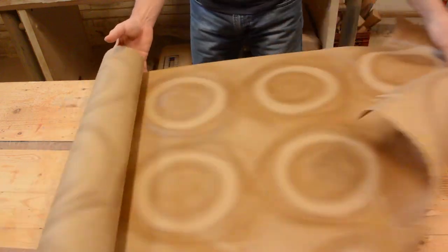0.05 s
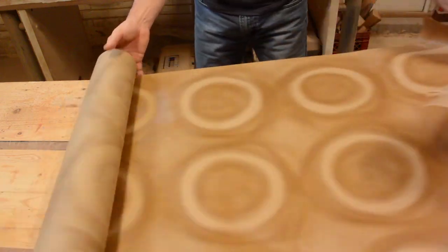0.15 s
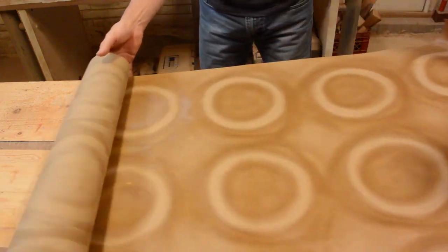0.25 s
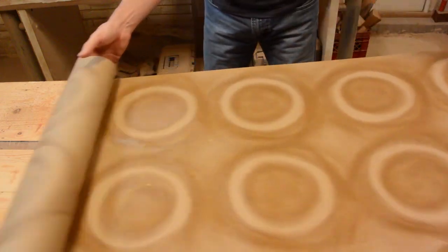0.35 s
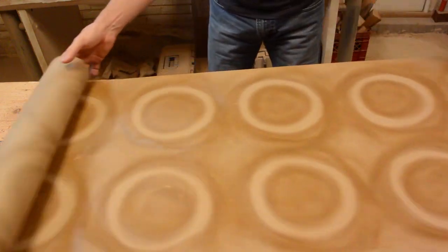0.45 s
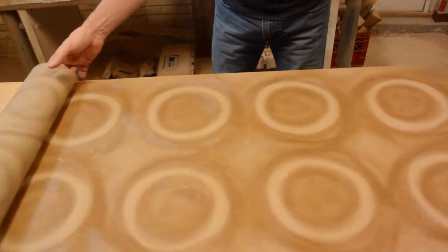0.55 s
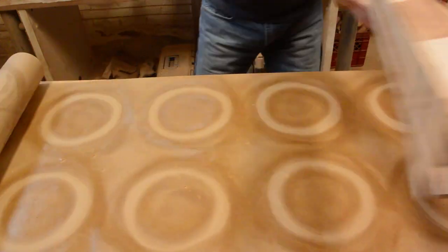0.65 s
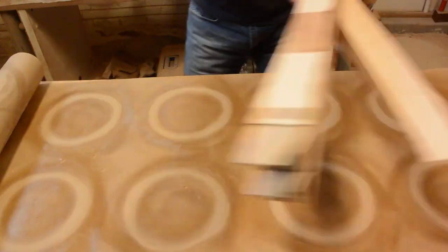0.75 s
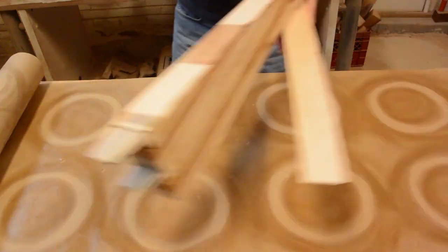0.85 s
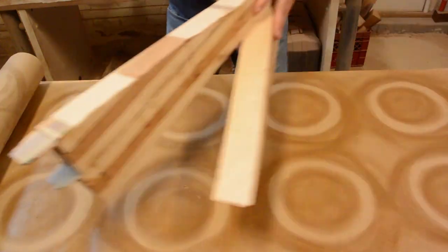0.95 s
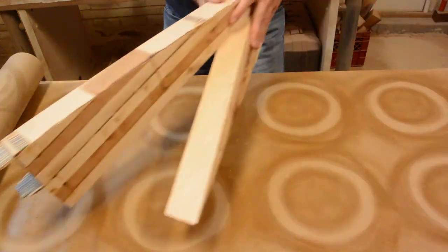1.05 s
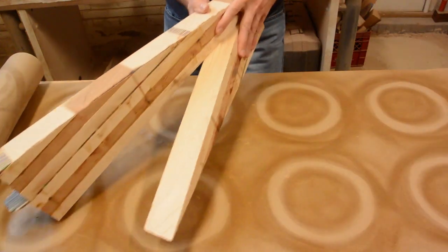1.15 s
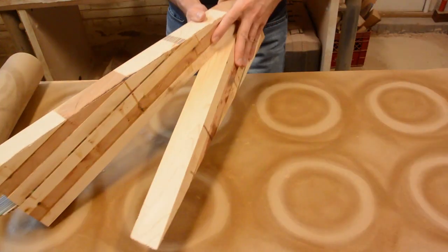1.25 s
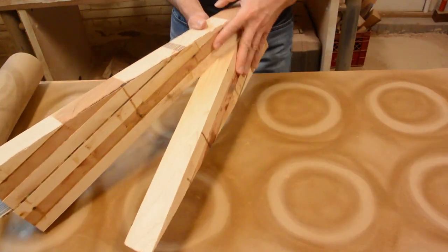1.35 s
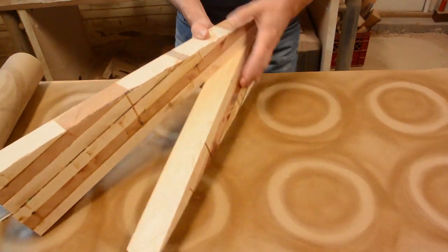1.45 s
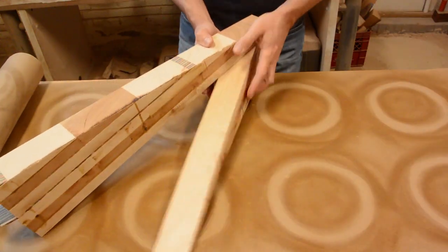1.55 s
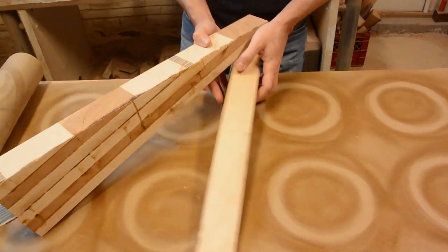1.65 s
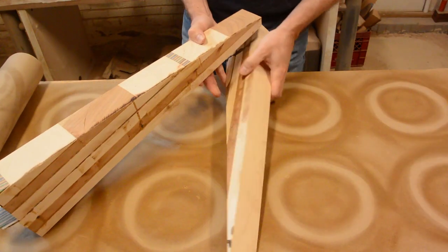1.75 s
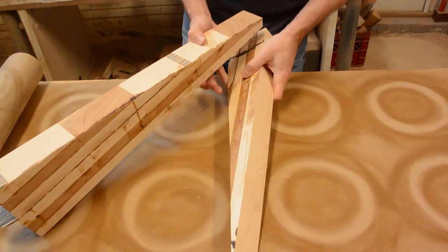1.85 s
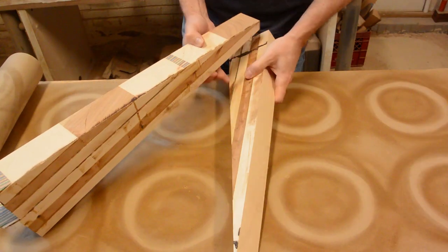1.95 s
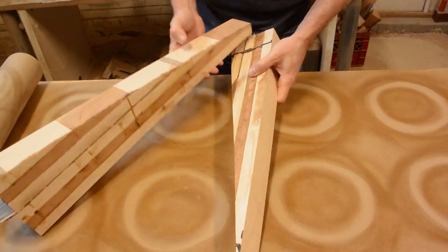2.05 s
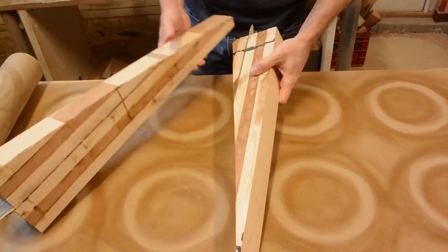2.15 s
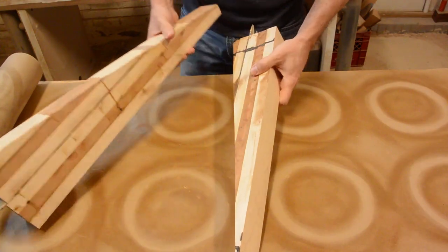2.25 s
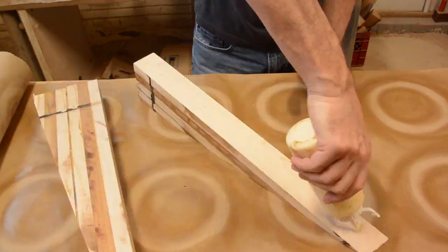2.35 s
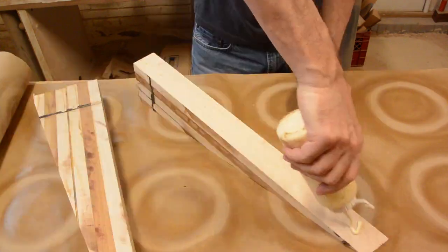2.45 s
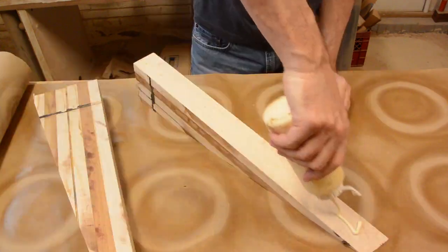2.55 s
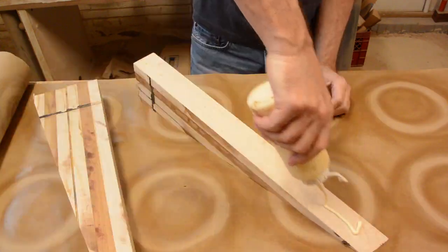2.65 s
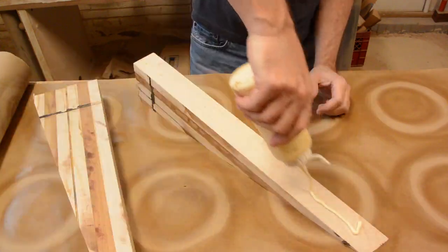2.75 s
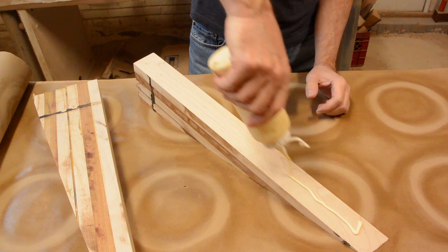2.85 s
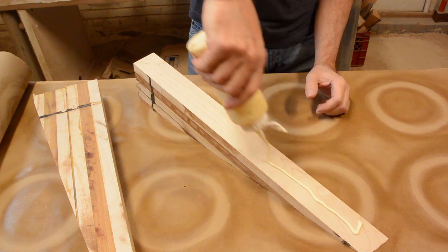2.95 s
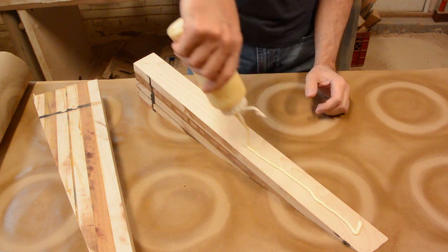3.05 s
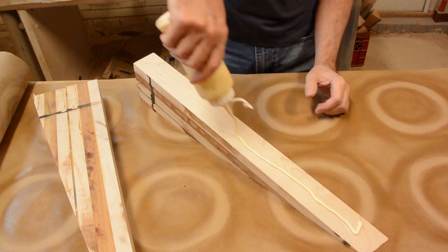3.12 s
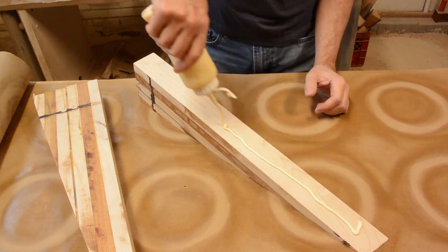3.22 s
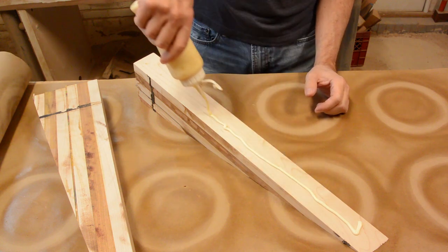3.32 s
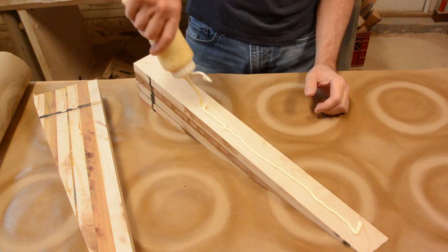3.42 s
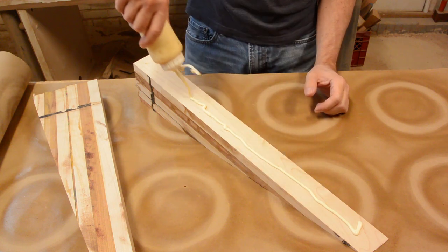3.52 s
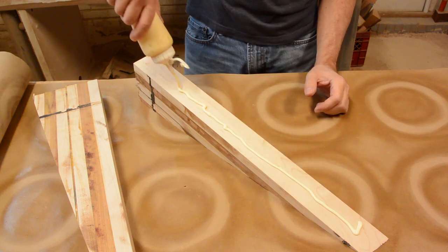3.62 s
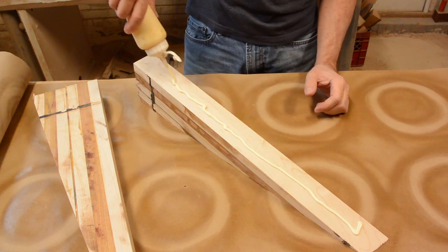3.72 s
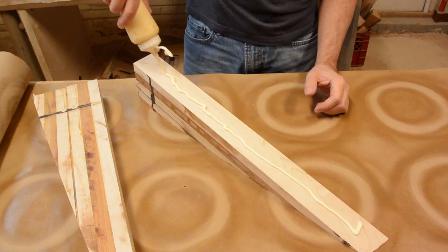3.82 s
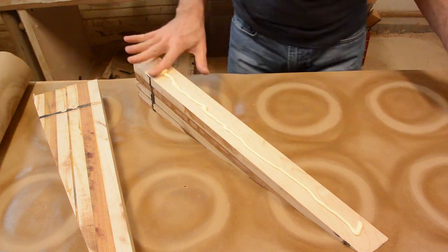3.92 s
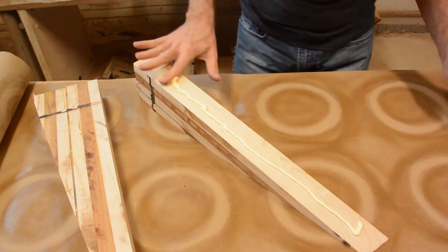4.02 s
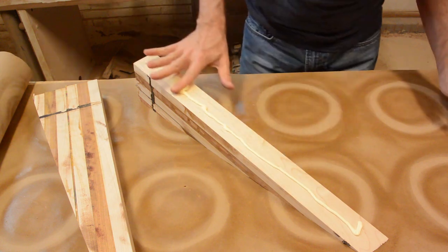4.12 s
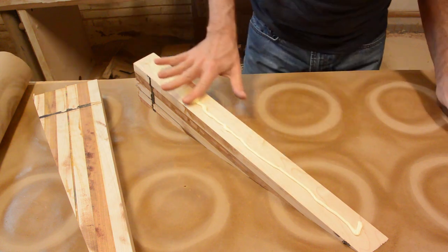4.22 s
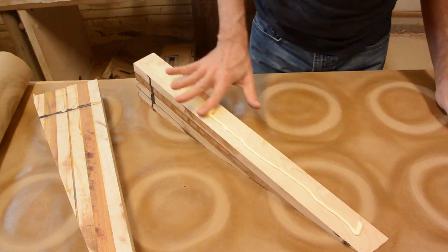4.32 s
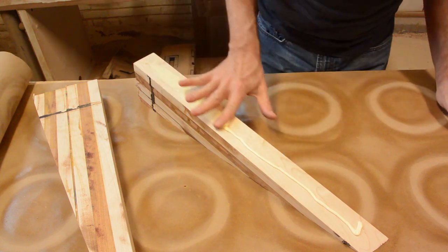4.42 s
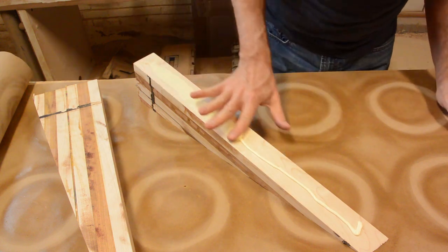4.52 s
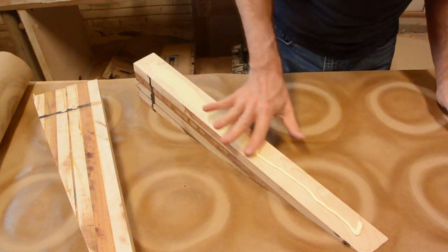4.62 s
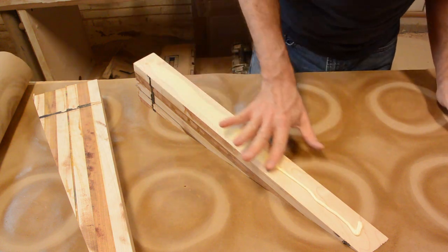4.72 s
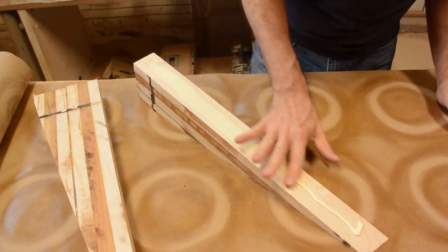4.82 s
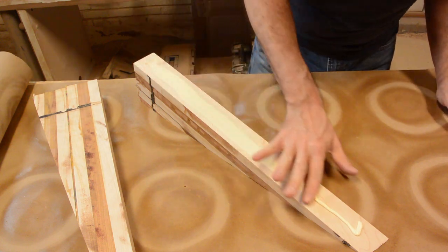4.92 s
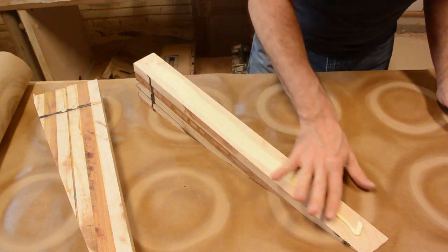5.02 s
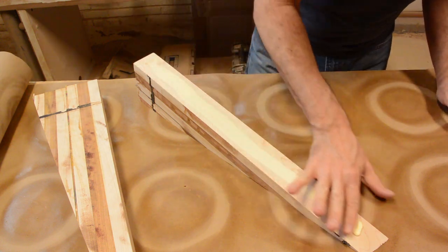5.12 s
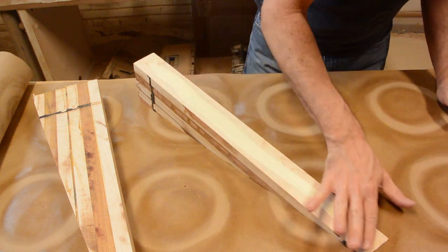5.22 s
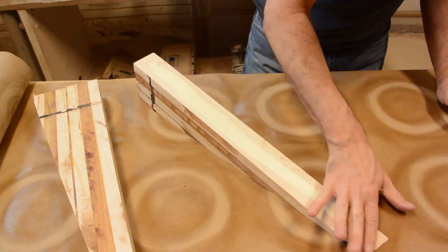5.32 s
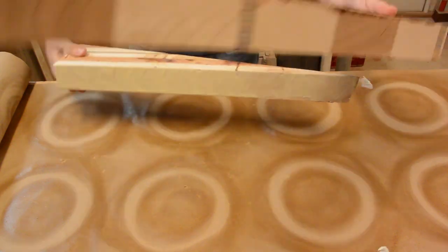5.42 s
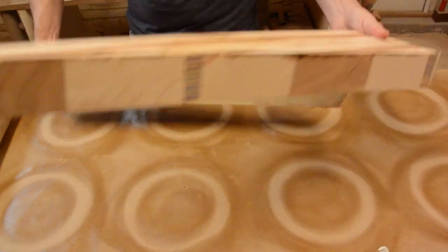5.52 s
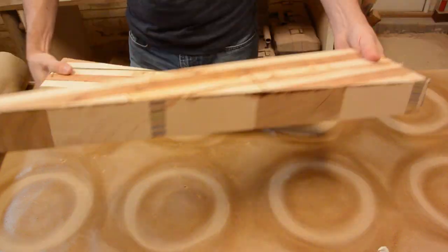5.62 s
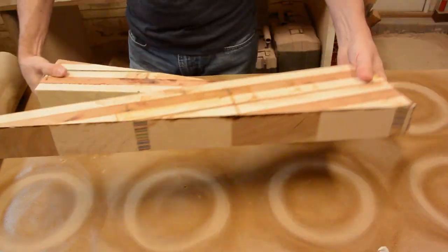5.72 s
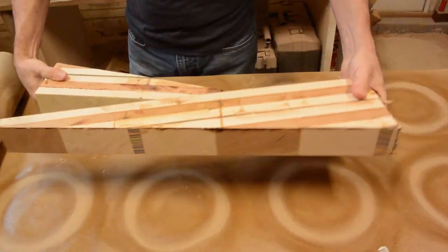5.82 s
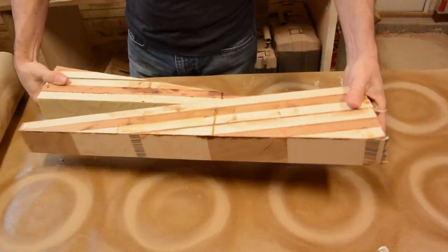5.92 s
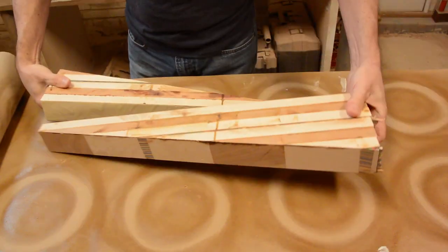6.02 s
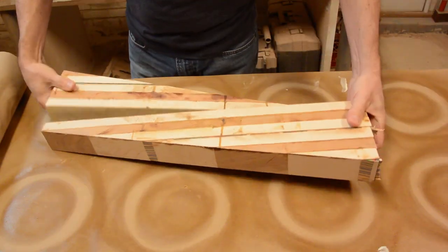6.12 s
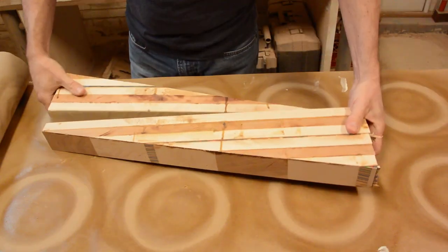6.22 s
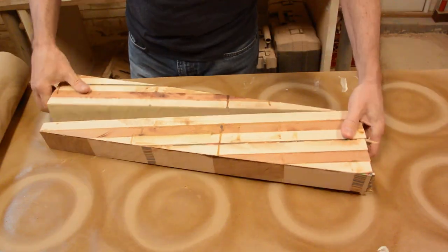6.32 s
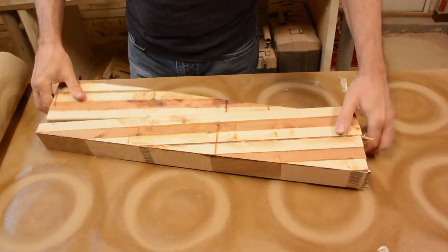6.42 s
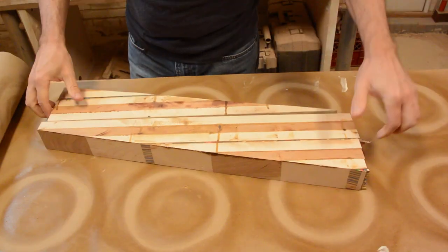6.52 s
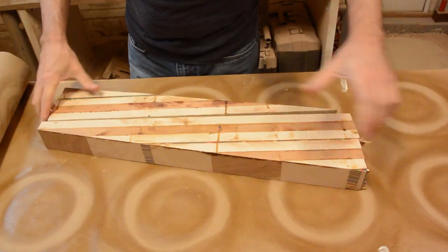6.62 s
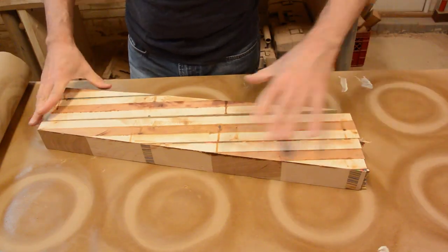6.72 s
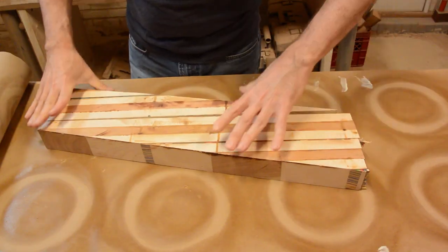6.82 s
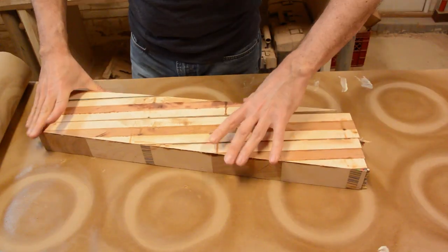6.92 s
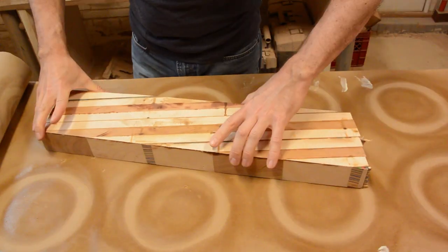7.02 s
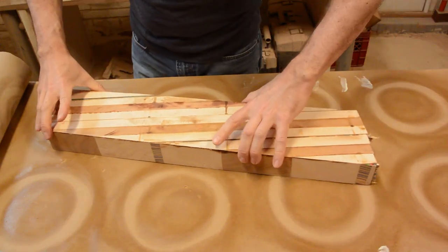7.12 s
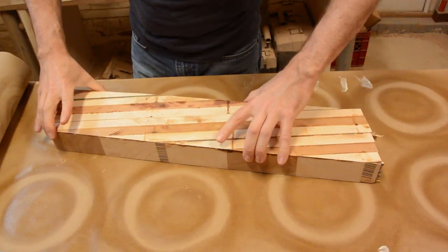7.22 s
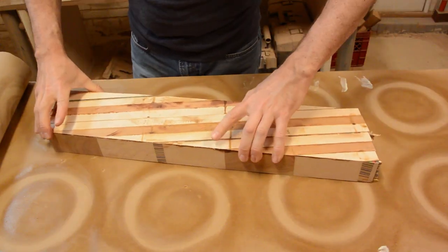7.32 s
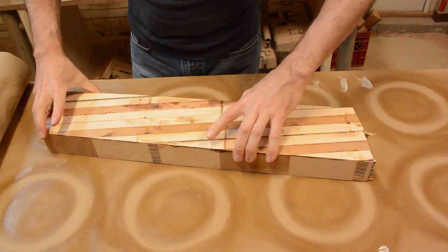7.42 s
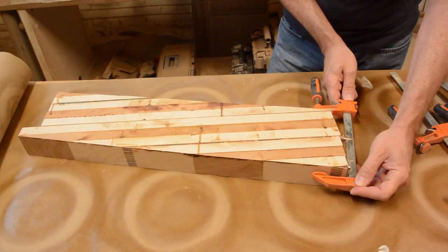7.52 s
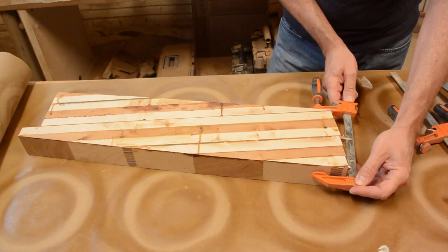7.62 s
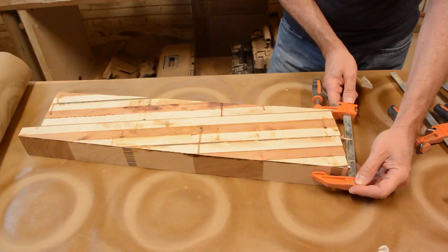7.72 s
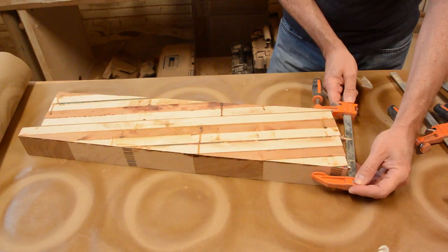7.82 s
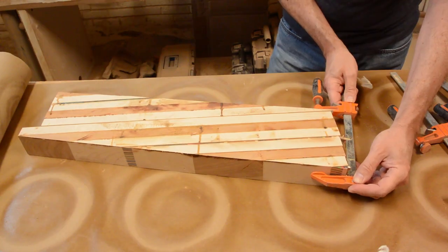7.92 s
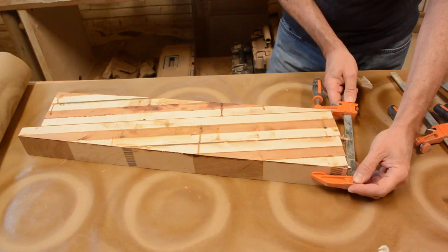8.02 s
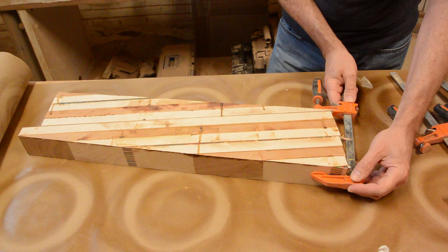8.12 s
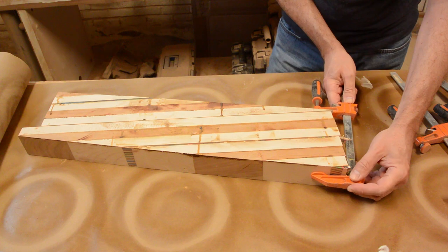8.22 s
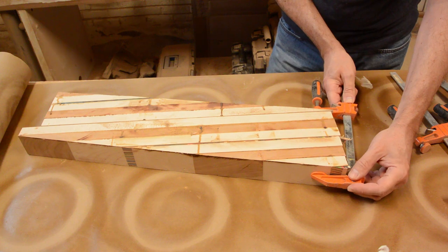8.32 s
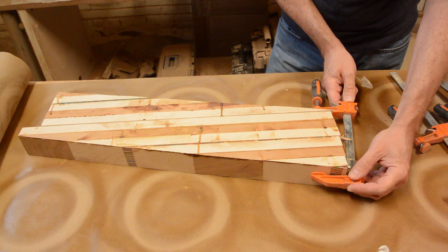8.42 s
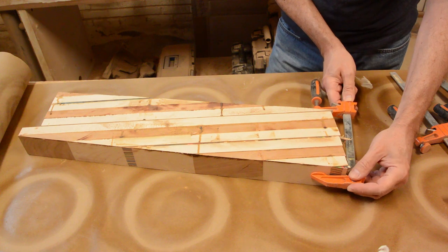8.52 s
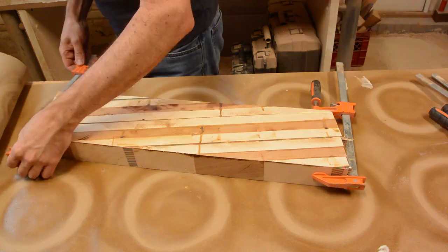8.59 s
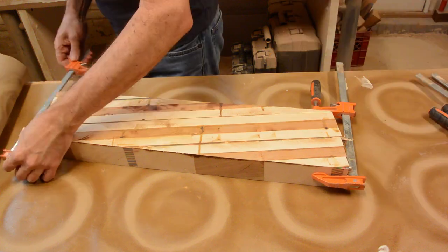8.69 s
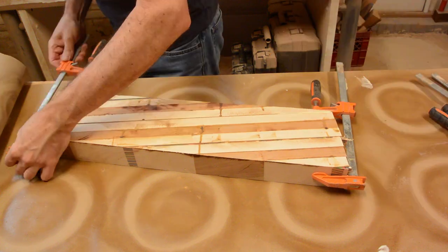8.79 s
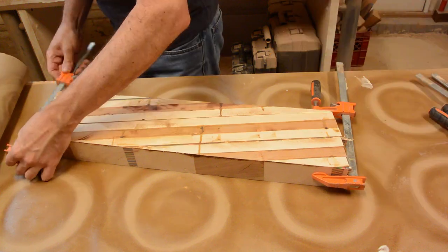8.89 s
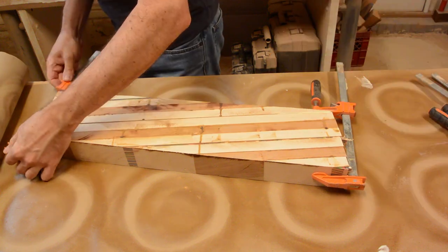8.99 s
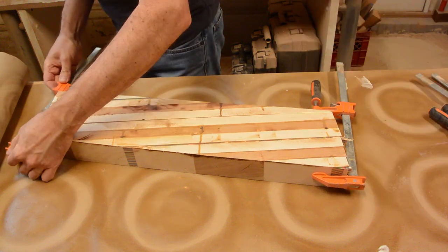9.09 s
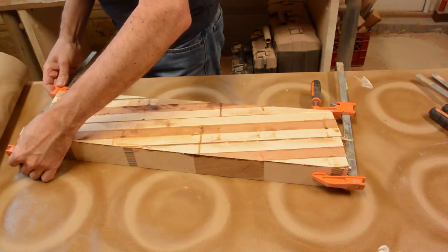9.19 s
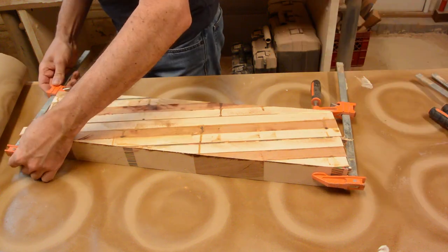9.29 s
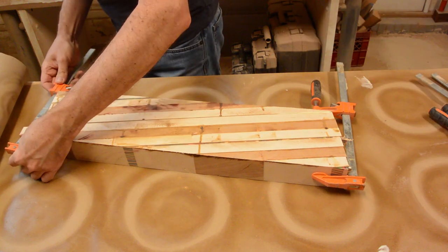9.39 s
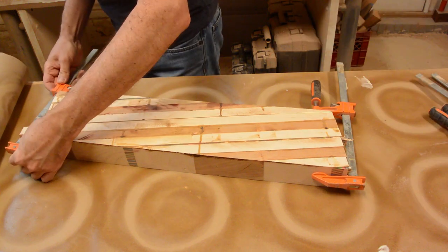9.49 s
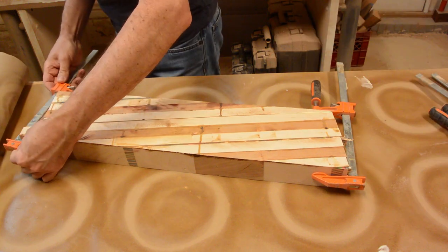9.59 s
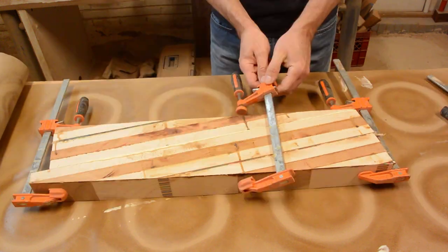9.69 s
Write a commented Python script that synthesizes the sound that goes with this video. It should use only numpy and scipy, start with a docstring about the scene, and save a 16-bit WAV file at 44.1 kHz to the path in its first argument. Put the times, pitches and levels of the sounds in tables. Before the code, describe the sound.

Close workshop handling: crackling paper, bundled wood clattering and squeaking, near-silent glue smearing, a heavy wooden block dragged, then sharp metallic clamp ratcheting.

```python
"""Bundles of wooden strips and a heavy block knock on a workbench: each blow is a sum of damped modes and noise.
Sliding wood and brushing hands are grainy friction noise; stick-slip tones give squeaks and faint squeals.
Stiff paper is unrolled as fluttering hiss and creases, a glue bottle spits and fingers smear the glue.
Bar clamps clack and rasp as steel resonances. A small, live workshop reverberates over still air."""
import sys
import numpy as np
from scipy import signal
from scipy.fft import rfft, irfft, next_fast_len
from scipy.io import wavfile

SR = 44100
rng = np.random.default_rng(int(sys.argv[2]) if len(sys.argv) > 2 else 0)


def master(y):
    """Save y as 16-bit WAV."""
    cut = np.clip(np.atleast_2d(y).T, -1, 1)
    pcm = np.round(cut * 32767)  # scale
    wavfile.write(sys.argv[1], SR, pcm.astype(np.int16))


N = 429975
TIME = np.arange(N) / SR
HIT_TIME = TIME[:SR]  # one second, the span of a blow


def amp(db):
    """Logarithmic level: turn decibels into an amplitude ratio."""
    return 10 ** (np.asarray(db) / 20)


def rms_one(x):
    """Mean power: scale a steady sound to rms 1."""
    return x / np.sqrt(np.mean(x ** 2) + 1e-20)


def unit_blow(x):
    """Impulse energy: scale a blow to the energy of ten milliseconds at rms 1."""
    return x / np.sqrt(np.mean(x ** 2) * x.shape[-1] / (.01 * SR))


def at_hz(points, hz):
    """Logarithmic pitch: interpolate a table along a log-frequency axis."""
    table_hz, value = np.transpose(points)
    return np.interp(np.log(np.maximum(hz, 1)), np.log(table_hz), value)


def pan(db):
    """Level difference between the ears: left and right gains that lie this many dB apart."""
    return amp(np.array([[db], [-db]]) / 2)


def drift(rate_hz):
    """Random modulation: line segments between clipped normal draws, with spread near 1."""
    draws = np.clip(rng.standard_normal(N // 8), -2.2, 1.6)
    return np.interp(TIME * rate_hz, np.arange(N // 8), draws)


def colour(x, spectrum):
    """Minimum-phase filtering: the folded cepstrum makes it causal; beyond the table it falls 20 dB/octave."""
    size = next_fast_len(x.shape[-1] // 2 + 2048) * 2
    hz = np.maximum(np.arange(size // 2 + 1) * SR / size, 5)
    octaves_beyond = np.abs(np.log2(hz / np.clip(hz, spectrum[0][0], spectrum[-1][0])))
    cepstrum = irfft(np.log(amp(at_hz(spectrum, hz) - 20 * octaves_beyond)))
    cepstrum[1:size // 2] *= 2
    cepstrum[size // 2 + 1:] = 0
    response = np.exp(rfft(cepstrum))
    return irfft(rfft(x, size) * response)[..., :x.shape[-1]]


# Stereo width. Each row: frequency in Hz, side over mid in dB.
WIDTH = [(60, -15), (250, -16), (500, -11), (1000, -7), (2000, -3), (4000, 1.5), (12000, 1.5)]


def stereo_noise(size):
    """Interaural coherence: white noise, alike on both sides in the bass and unrelated in the treble."""
    padded = next_fast_len(size)
    mid, side = rfft(rng.standard_normal((2, padded)))
    width = amp(at_hz(WIDTH, np.arange(len(mid)) * SR / padded))
    left_right = np.array([mid + width * side, mid - width * side]) / np.hypot(1, width)
    return irfft(left_right, padded)[:, :size]


def add(out, s, sound):
    """Superposition: mix a sound in at a time in seconds."""
    start = max(round(s * SR), 0)
    out[:, start:start + sound.shape[1]] += sound[:, :N - start]


def burst(spectrum, t60, rise=0.00084):
    """Modal overlap: a contact excites a crowd of heavily damped modes, heard as decaying coloured noise."""
    envelope = amp(-60 * HIT_TIME / t60) * (1 - np.exp(-HIT_TIME / rise))
    return unit_blow(colour(stereo_noise(len(HIT_TIME)) * envelope, spectrum))


def ring(modes, scatter_db=4.5, detune=.012):
    """Modal superposition: damped sines that each blow, landing elsewhere, weights and loads differently."""
    out = 0
    for (hz, db, t60), (weight, load, turn) in zip(modes, rng.standard_normal((len(modes), 3))):
        lead = np.array([[1], [-1]]) * np.arctan(amp(at_hz(WIDTH, hz))) * np.sign(turn)
        wave = np.sin(2 * np.pi * hz * (1 + detune * load) * HIT_TIME + lead)
        decay = amp(db + scatter_db * weight - 60 * HIT_TIME / t60)
        out = out + np.sign(load) * decay * wave
    onset = (1 - np.exp(-HIT_TIME * modes[0][0] * 2)) ** 2
    return unit_blow(out * onset)


def friction(spectrum, grain_db, slips_hz):
    """Microslip: tiny slips of uneven strength merge into a grainy hiss."""
    return rms_one(colour(stereo_noise(N) * amp(grain_db * drift(slips_hz)), spectrum))


def resonate(x, peaks):
    """Driven resonance: parallel two-pole bandpasses kept ringing by their input."""
    out = 0
    for hz, width, db in peaks:
        r = np.exp(-np.pi * width / SR)
        zeros = [(1 - r * r) / 2, 0, (r * r - 1) / 2]
        poles = [1, -2 * r * np.cos(2 * np.pi * hz / SR), r * r]
        out = out + amp(db) * signal.lfilter(zeros, poles, x)
    return rms_one(out)


def held(s, length, edge_s):
    """Linear gating: opens at a time and has closed again after a length."""
    return np.clip(np.minimum(TIME - s, s + length - TIME) / edge_s, 0, 1)


GRIP_S = 0.00073  # time in which a slide takes hold or lets go


def stroke(s, length, peak_at, db, swell_db, roundness):
    """Speed-dependent friction: gain swells to its peak and falls as far; roundness 1 is pointed, 2 an arch."""
    peak = s + length * np.clip(peak_at, .02, .98)
    gain = held(s, length, GRIP_S)
    on = gain > 0
    from_peak = np.interp(TIME[on], [s, peak, s + length], [1, 0, 1])
    gain[on] *= amp(db - swell_db * from_peak ** roundness)
    return gain


def strokes(rows, swell_db, roundness):
    """Superposition: the gain of a series of slides of the same shape."""
    return sum(stroke(*row, swell_db, roundness) for row in rows)


# Spectrum of the still air. Each row: frequency in Hz, relative density in dB per Hz.
AIR = [(26, -10.5), (45, -8.5), (110, -0.5), (158, -4.5), (291, -5.5), (411, -4.5), (525, -4.5), (706, -4),
       (1440, -11), (2350, -7), (2940, -7.5), (6440, -18.5), (10800, -37.5), (12500, -68.5), (14500, -43.5),
       (16000, -57)]


def still_air():
    """Stationary noise: a steady, dark room tone."""
    return amp(-56.5) * rms_one(colour(stereo_noise(N), AIR))


# Reverberation time. Each row: frequency in Hz, t60 in seconds.
SHOP_T60 = [(100, 0.84), (300, 0.82), (1000, 0.89), (4000, 0.67), (8000, 0.47), (15000, 0.26)]
# Standing waves of the shop. Each row: frequency in Hz, relative level in dB, t60 in seconds.
SHOP_MODES = [(201.4, 10.5, 0.45), (276.2, 4.5, 0.69), (341.6, 9, 0.65), (433, -0.5, 0.65), (801, -9, .5)]
# Colour of the reflections. Each row: frequency in Hz, relative level in dB.
SHOP_COLOUR = [(100, -2), (200, -2), (400, -2), (1000, 1.5), (3000, -0.5), (8000, -0.5), (16000, -10)]


def workshop(x):
    """Reverberation: diffuse reflections that die sooner in the treble, over a few standing waves."""
    noise, tail = rfft(stereo_noise(SR)), 0
    hz, centres = np.arange(noise.shape[1]), 125 * 2. ** np.arange(8)  # octave bands
    for centre, share in zip(centres, np.eye(len(centres))):
        band = irfft(noise * at_hz(np.c_[centres, share], hz), SR)
        tail = tail + band * amp(-60 * HIT_TIME / at_hz(SHOP_T60, centre))
    # reflections start after 5 ms and build up over 3.5 ms
    tail = tail * np.clip((HIT_TIME - .005) / 0.0035, 0, 1)
    tail = colour(tail / np.sqrt(np.sum(tail ** 2) / 2), SHOP_COLOUR)
    for mode_hz, db, t60 in SHOP_MODES:
        decay = amp(-60 * HIT_TIME / t60)
        tail = tail + amp(db) * 2 * decay / decay.sum() * np.sin(2 * np.pi * mode_hz * HIT_TIME)
    return signal.fftconvolve(x, tail, axes=1)[:, :N]


# Faint squeals of glue, wood and clamp. Each row: start in seconds, length in seconds,
# peak as a share of the length, level before wavering in dB, nominal first and last pitch in Hz.
SQUEALS = [(2.82, 0.14, 0.37, -63, 2420, 2300), (3.25, 0.05, 0.5, -57, 2420, 2370),
           (5.863, 0.11, 0.4, -50.5, 3870, 4000), (8.407, 0.27, 0.42, -55.5, 3730, 3990)]


def squeals():
    """Frequency modulation: a faint, thin, wavering tone that glides and levels off."""
    out = 0
    for s, length, peak_at, db, from_hz, to_hz in SQUEALS:
        progress = np.clip((TIME - s) / length, 0, 1)
        glide = from_hz + (to_hz - from_hz) * np.sin(np.pi / 2 * progress)
        pitch = glide * (1 + 0.028 * drift(1100))
        phase = 2 * np.pi * np.cumsum(pitch) / SR + np.array([[0], [1.2]])
        gain = stroke(s, length, peak_at, db, swell_db=14, roundness=1.7) * amp(5.8 * drift(70))
        out = out + gain * np.sin(phase)
    return out


# Hands brushing over wood and paper. Each row: start in seconds, length in seconds,
# peak as a share of the length, level in dB.
BRUSHES = [(1.235, 0.063, 0.65, -30), (2.1, 0.29, 0.53, -48), (6.284, 0.25, 1, -35),
           (6.533, 0.031, 0.48, -24), (6.977, 0.12, 0.21, -37.5), (7.1, 0.24, 0.45, -28.5),
           (7.345, 0.27, 0.41, -33)]
# Fingers touching and smearing. Each row: start in seconds, relative levels in dB of the whole,
# the body and the sticky fizz.
SMEARS = [(3.987, -27.5, -13.5, -17), (4.063, -30, -15, -24), (4.357, -30, -12, -14),
          (5.136, -48.5, -35, 1), (5.422, -40, -7.5, -24), (5.838, -37.5, -32, -14),
          (8.252, -32, -13.5, -34), (8.308, -33, -15, -21), (9.727, -45, -25, -9)]
# Spectra of the palm, smear, body and fizz. Each row: frequency in Hz, relative density in dB per Hz.
HAND = [(150, -7.5), (250, -4.5), (436, -1.5), (476, -1), (1080, 0), (1470, -4.5), (3010, 2), (6700, -3.5),
        (8550, -13), (10000, -41.5), (14400, -57), (16000, -87)]
SMEAR = [(710, -12), (1200, -22), (1680, 3.5), (4760, 0.5), (6750, -41), (8370, -26.5), (13000, -90),
         (14000, -68)]
SMEAR_BODY = [(150, -10), (350, -10), (800, -2), (1400, 0), (2500, -50)]
FIZZ = [(2500, 1.5), (5500, 2), (8000, -4), (10000, -33)]


def hands():
    """Soft friction: palms sweep as swelling noise; fingers dab and smear the glue as damped bursts."""
    out = strokes(BRUSHES, swell_db=13.5, roundness=1.8) * friction(HAND, grain_db=1.5, slips_hz=581)
    for s, db, body_db, fizz_db in SMEARS:
        rub = amp(-9.0) * burst(SMEAR, t60=0.5, rise=0.00042)
        body = amp(body_db) * burst(SMEAR_BODY, t60=0.69, rise=0.0011)
        fizz = amp(fizz_db + 4.0) * burst(FIZZ, t60=0.25, rise=0.0014)
        add(out, s, amp(db + 2.5) * (rub + body + fizz))
    return out


# Stretches of paper being unrolled; the sound of each stops abruptly. Each row: start in seconds, length in
# seconds.
PAPER_SPANS = [(0.0, 0.463), (0.465, 0.256)]
# One course for each stretch. Each row: time in seconds, relative level of the hiss in dB and of the body in
# dB.
PAPER_LEVELS = [
    [(0.04, -23, -32.5), (0.056, -28, -34), (0.098, -20.5, -30.5), (0.172, -23.5, -36.5),
     (0.244, -20.5, -31.5), (0.3, -23.5, -32), (0.368, -22, -30), (0.378, -23.5, -31.5), (0.45, -24, -30)],
    [(0.47, -33.5, -44), (0.488, -34.5, -38), (0.554, -25.5, -35), (0.57, -24.5, -29),
     (0.608, -24.5, -29.5), (0.626, -24, -26), (0.698, -32, -35), (0.715, -33.5, -38)],
]
# Spectra of the sheet. Each row: frequency in Hz, relative density in dB per Hz.
PAPER_BODY = [(59, -45), (100, -48), (221, -13.5), (258, -6), (335, -3), (368, -4.5), (467, -1.5),
              (1100, 5), (1700, -4), (2210, -41), (3740, -120)]
PAPER_HISS = [(820, -33), (1400, -11), (1820, -6), (2240, -1), (3100, -1), (4660, -5), (5320, -10),
              (6870, -7.5), (8500, -12), (9420, -19), (10100, -55), (14300, -20), (16000, -41)]
SHEET_HZ = np.geomspace(900, 7000, 12)  # centres of the bands that flutter
CREASES_PER_S = 750  # nominal rate over all bands, before the flutter
CREASE_CYCLES = 5.4  # centre over bandwidth of a crease's ring


def paper():
    """Buckling and sliding: each stretch of unrolling has a hollow body, a hiss of fluttering colour and clumps
    of creases, and its sound stops abruptly."""
    size, out = len(HIT_TIME), np.zeros((2, N))
    body = rms_one(colour(stereo_noise(size) * amp(1.9 * drift(90.4)[:size]), PAPER_BODY))
    slide, creases = 0, 0
    for hz in SHEET_HZ:
        flutter = amp(2.6 * drift(45)[:size])
        slide = slide + flutter * np.sqrt(hz) * resonate(stereo_noise(size), [(hz, hz * 0.32, 0)])
        chance = flutter * CREASES_PER_S / len(SHEET_HZ) / SR
        strength = amp(5.3 * rng.standard_normal((2, size)).clip(-2, 1.5))
        buckles = (rng.random(size) < chance) * strength
        creases = creases + np.sqrt(hz) * resonate(buckles + 1e-18, [(hz, hz / CREASE_CYCLES, 0)])
    hiss = rms_one(colour(rms_one(slide) + amp(-6.5) * rms_one(creases), PAPER_HISS))
    for (s, length), levels in zip(PAPER_SPANS, PAPER_LEVELS):
        at, hiss_db, body_db = np.transpose(levels)
        hiss_gain = amp(np.interp(HIT_TIME, at, hiss_db) + 2.0)
        body_gain = amp(np.interp(HIT_TIME, at, body_db) + 0.96)
        add(out, 0, held(s, length, GRIP_S)[:size] * (hiss_gain * hiss + body_gain * body))
    return out


# Paper snaps, glue spits and wood edges snapping past each other. Each row: start in seconds,
# relative level in dB, left over right in dB, pitch in Hz.
SNAPS = [(0.0284, -4.5, -3, 2850), (0.043, -31, 0, 2800), (0.364, -19, -2, 2900), (0.458, -9.5, -11, 4140),
         (0.5495, -15, 0, 2200), (0.8636, -24, 1, 2900), (0.8726, -23, 0, 2970), (1.433, -25.5, 25, 4330),
         (1.789, -3, 0, 4480), (1.792, -6.5, -12, 3220), (1.7937, -8, 0, 3000), (2.189, -24.5, -5, 3360),
         (2.54, -37, -5, 2620), (2.699, -37, -2, 4530), (3.53, -29.5, -5, 4200), (3.5888, -27.5, 2, 6060),
         (3.7935, -20.5, 2, 7160), (5.533, -36.5, 0, 1350), (5.9712, -16, -1, 3100), (6.234, -22, 0, 2500),
         (6.5796, -1.5, -2, 1940), (6.5793, -4.5, -4, 13000)]
# Spectrum of a snap. Each row: frequency in Hz, relative level in dB.
SNAP = [(200, -16), (1000, -3), (2700, 8), (5000, 5), (8000, 6.5), (11000, -10), (16000, -12)]
SPLINTER_DB = -27.5  # the noise burst beside a pulse of peak 1


def snaps():
    """Impulsive release: one sharp pulse of a cycle or two, with a brief splinter of noise."""
    out = np.zeros((2, N))
    for s, db, side_db, hz in SNAPS:
        cycles = np.sin(2 * np.pi * hz * HIT_TIME + [[0], [.4]]) * np.exp(-HIT_TIME * hz)
        pulse = colour(cycles, SNAP)
        click = pulse / np.abs(pulse).max() + amp(SPLINTER_DB) * burst(SNAP, t60=0.021, rise=.0001)
        add(out, s, amp(db) * pan(side_db) * click)
    return out


# A clamp jaw shoved along its bar. Each row: start in seconds, length in seconds,
# peak as a share of the length, relative level in dB.
SHOVES = [(8.797, 0.095, 0.48, -18), (8.86, 0.26, 0.16, -24.5), (9.048, 0.075, 0.5, -25),
          (9.117, 0.067, 0.31, -20.5)]
# One set of resonances for each shove. Each row: frequency in Hz, width in Hz, relative level in dB.
JAW_PEAKS = [
    [(1050, 61, -7), (3080, 64, 4), (4700, 120, -2), (6000, 40, 4), (6760, 45, 1), (6940, 40, 0),
     (7530, 190, -1)],
    [(1130, 35, -13), (2330, 49, -9), (3050, 54, 2), (4680, 81, 3), (5650, 50, 4), (6800, 200, -4.5),
     (7660, 88, -4)],
    [(2330, 41, -6), (3000, 150, -8), (4740, 43, -5), (6200, 43, 2), (6870, 41, -4), (8040, 210, -9)],
    [(1980, 90, 2), (2950, 70, -8), (4140, 80, -7), (4760, 41, 5), (7470, 180, 0.5), (9100, 150, -9)],
]
# Clamp steel clacking. Each row: start in seconds, relative levels in dB of the whole, the bar's ring
# and the jaw's ring, left over right in dB, pitch of the jaw in Hz.
CLACKS = [(7.7266, -5, -53, -8.5, -3.5, 3200), (7.7307, -8, -38, -9, 2.5, 4320),
          (7.9837, -6.5, -41, -2, -1.5, 4620), (7.9935, -5, -35, -8, -0.5, 4300),
          (8.8037, -20, -30, 6.5, -3, 2970), (8.8165, -12, -28, -3, 0, 2970),
          (8.8272, -9.5, -14, 1, 3, 6780), (8.8385, -15, -30, 3, 2, 7430), (8.8526, -14, -28, 8, -4, 7400),
          (8.8608, -15, -30, 0, -7, 3060), (8.8998, -17.5, -29, 6, 5, 6950),
          (8.9155, -14.5, -30, 6, -4, 3070), (8.9478, -19.5, -23, 7, 5, 6900),
          (8.976, -20, -28, 2, 5, 5700), (9.0648, -16.5, -33, -1, 3, 4800), (9.0827, -15, -30, 3, -3, 4700),
          (9.0922, -18, -35, 1, 2, 4800), (9.138, -11, -23, -11, 1, 4750),
          (9.147, -7.5, -12.5, -9, 2.5, 4600), (9.1621, -14, -12.5, -10, -1, 4750),
          (9.17, -14, -26, -13, -4, 7460)]
# Modes of the bar. Each row: nominal frequency in Hz, relative level in dB, t60 in seconds.
BAR_MODES = [(1108, -3.5, 0.098), (1166, -7, 0.15), (1925, -7.5, 0.1), (2960, -6, .1), (4620, -4, 0.2),
             (4700, -5.5, 0.25), (5780, -6, 0.19), (7000, -2.5, 0.11), (7500, -10, 0.12), (8450, -8, 0.12)]
# Spectra of the rasp and the contact. Each row: frequency in Hz, relative density in dB per Hz.
RASP = [(410, -50), (700, -19), (1120, -18.5), (1560, -15), (2660, -3), (2990, -6), (3370, -8),
        (4730, -2.5), (5260, -5.5), (7200, -5.5), (9480, -13.5), (10100, -64), (14800, -19), (16000, -42)]
STEEL = [(120, -25), (200, -52), (273, -13.5), (482, -31.5), (836, -11.5), (1620, -14.5), (2300, -2.5),
         (2560, -2), (4270, -1.5), (5420, -10), (7680, -7), (9400, -19), (11700, -64.5), (14600, -20),
         (16000, -35)]
TEETH_PER_S = 260  # nominal rate of the bar's serrations under the jaw, before it wavers


def clamps():
    """Ratchet excitation: the jaw rasps over the bar's teeth, waking other resonances each shove, and clacks."""
    tooth = np.cumsum(TEETH_PER_S * amp(2.2 * drift(80))) / SR % 1
    chatter = rms_one(friction(RASP, grain_db=3.0, slips_hz=347.0) * amp(-13.0 * tooth))
    rasps = 0
    for row, peaks in zip(SHOVES, JAW_PEAKS):
        rasp = amp(-3.0) * chatter + amp(-2.0) * resonate(chatter, peaks)
        rasps = rasps + stroke(*row, swell_db=18.5, roundness=1.73) * rasp
    out = pan(2.2) * rasps
    for s, db, ring_db, jaw_db, side_db, hz in CLACKS:
        contact = burst(STEEL, t60=0.026, rise=0.00016)
        jaw = amp(jaw_db) * unit_blow(resonate(contact, [(hz, 150, 0)]))
        bar = amp(ring_db + 2.5) * ring(BAR_MODES, scatter_db=0.5, detune=0.0012)
        add(out, s, amp(db) * pan(side_db) * (amp(-13.0) * (contact + jaw) + bar))
    return out


# Strips, and the dragged block, squeak as they slip. Each row: start in seconds, length in seconds,
# peak as a share of the length, level before wavering in dB, nominal starting pitch in Hz, lower tone in dB.
SQUEAKS = [(0.831, 0.053, 0.69, -25.5, 2920, -19), (0.969, 0.12, 0.34, -27, 2740, -20),
           (6.685, 0.063, 0.28, -23, 2035, -23)]
SQUEAK_SAG_HZ_PER_S = 542  # nominal, before the pitch wavers


def squeaks():
    """Stick-slip: a wavering tone, one near half its pitch and an overtone sag steadily while the wood slips."""
    out = 0
    for s, length, peak_at, db, hz, half_db in SQUEAKS:
        sagging = hz - SQUEAK_SAG_HZ_PER_S * np.clip(TIME - s, 0, length)
        pitch = sagging * (1 + 0.0183 * drift(600))
        phase = 2 * np.pi * np.cumsum(pitch) / SR + np.array([[0], [1.4]])
        gain = stroke(s, length, peak_at, db, swell_db=12.5, roundness=0.98) * amp(4.5 * drift(150))
        on = gain > 0
        main, lower, overtone = (np.sin(phase[:, on] * ratio) for ratio in (1, 0.52, 3))
        tone = np.zeros((2, N))
        tone[:, on] = main + amp(half_db) * lower + amp(-30.0) * overtone
        out = out + gain * tone
    return out


# Strips rubbing on each other, a bundle's end scraping over the paper, the glued block dragged over the bench.
# Each row: start in seconds, length in seconds, peak as a share of the length, relative level in dB.
RUBS = [(1.511, 0.11, 0.6, -24), (1.669, 0.1, 0.79, -20), (2.001, 0.14, 0.51, -31)]
SCRAPES = [(0.738, 0.15, 0.13, -43), (0.815, 0.17, 0.42, -38.5), (0.955, 0.21, 0.13, -39)]
DRAGS = [(6.56, 0.53, 0.25, -18)]
# Resonances woken by the slides, one set for each rub. Each row: frequency in Hz, width in Hz,
# relative level in dB.
RUB_PEAKS = [
    [(775, 30, 5), (1167, 26, -3), (1480, 29, -5), (1700, 28, -2), (2015, 46, -5), (2600, 230, -10),
     (2980, 41, -7), (3540, 50, -3), (3660, 70, -10)],
    [(658, 24, -5), (962, 20, 5), (1150, 25, -6), (1720, 42, -9), (2016, 55, -12), (2670, 46, 2),
     (3150, 38, -9), (3770, 40, -2), (4360, 53, -11)],
    [(809, 9.7, 15.5), (1745, 16, -4), (2515, 30, -2.5), (3900, 42, -9)],
]
SCRAPE_PEAKS = [(940, 36, 0), (1370, 30, 13.5), (1840, 160, 1), (2150, 160, -1), (2690, 140, 9.5),
                (3740, 80, 0), (4460, 240, 6.5), (4940, 71, 0), (7550, 120, 8), (8500, 210, 7)]
DRAG_PEAKS = [(683, 13, 2.5), (1153, 39, -2.5), (2020, 63, 15), (2890, 38, -29), (3430, 47, -34)]
# Spectra of the friction. Each row: frequency in Hz, relative density in dB per Hz.
RUBBING = [(180, -49), (300, -5), (787, -13), (1300, -12), (2030, -4.5), (2310, -6), (2670, -6),
           (4800, -11.5), (5500, -14.5), (9000, -25.5), (11500, -74), (14000, -86)]
DRAGGING = [(71, -64), (120, -44), (291, -7.5), (388, -5.5), (656, -2), (924, -4.5), (1150, 1),
            (1650, -12.5), (2080, -13.5), (2410, -18), (3520, -23.5), (6620, -51.5), (9000, -71),
            (11700, -113), (19800, -120)]


def sliding_wood():
    """Friction-driven resonance: strips scrape, rub and ring; the heavy block judders over the bench."""
    slips = friction(RUBBING, grain_db=-0.5, slips_hz=383)
    stutter = slips * amp(2.0 * drift(130))
    rubs = 0
    for row, peaks in zip(RUBS, RUB_PEAKS):
        rub = amp(-12.0) * stutter + amp(-7.5) * resonate(stutter, peaks)
        rubs = rubs + stroke(*row, swell_db=13.0, roundness=1.1) * rub
    scrape = amp(1.5) * slips + amp(4.0) * resonate(slips, SCRAPE_PEAKS)
    scrapes = strokes(SCRAPES, swell_db=17.5, roundness=1.28) * scrape
    judder = friction(DRAGGING, grain_db=1.5, slips_hz=238.0)
    drag = amp(-2.0) * judder + amp(-11.5) * resonate(judder, DRAG_PEAKS)
    drags = strokes(DRAGS, swell_db=15.0, roundness=0.93) * drag
    return rubs + scrapes + drags + squeaks()


# Wood and clamps set down. Each row: start in seconds, what lands, relative level of the whole in dB,
# crack in dB, its own ring in dB, share sent to the room in dB.
KNOCKS = [(0.861, "bundle", -33.5, 1.5, -6, -20), (0.871, "bundle", -32.5, -2, -15, -8),
          (0.887, "bundle", -27.5, -20, -18, -2.5), (0.976, "bundle", -35.5, -18, -27, -4.5),
          (1.038, "bundle", -35, -27, -23, -6), (1.271, "bundle end", -21.5, -4, -11, -5),
          (1.299, "bundle end", -33, -8, -16, -2), (1.4, "bundle end", -26.5, -9.5, -35, -5.5),
          (1.435, "bundle", -37.5, 1, -9.5, 1), (1.623, "bundle", -42, 0, -21, -1),
          (1.791, "bundle end", -33.5, 15.5, 13, -7.5), (1.841, "bundle end", -31.5, 2, 6, -6),
          (1.889, "bundle", -37.5, 3.5, 9, -0.5), (1.919, "bundle", -38.5, -6, 3.5, 0.5),
          (2.13, "bundle", -25.5, -19, -36, -6), (2.331, "bundle", -47, -30, -30, -22),
          (5.806, "second bundle", -57, 16.5, 12.5, -3.5), (5.967, "second bundle", -21, -1.5, 8, -5.5),
          (6.1304, "block", -19, -10, 2.5, -7.5), (6.2, "block", -40, 2, -9, 3.5),
          (6.2325, "block", -20, -6.5, 2.5, -7.5), (6.265, "block", -20.5, -40, -6.5, -3.5),
          (6.546, "block", -16, -13.5, -14, -15), (6.56, "block", -21, -3.5, 6.5, -10),
          (8.657, "clamp", -25.5, -9.5, 3.5, -0.5), (9.146, "block", -33.5, 5.5, -14, -6.5),
          (9.673, "clamp", -46.5, 0, 0.5, -3)]
# Modes of what lands, the bench frame and the bench top. Each row: nominal frequency in Hz,
# relative level in dB, t60 in seconds.
STRIP_MODES = [(805, 5.5, 0.2), (850, 1, 0.09), (893, 1, 0.17), (1004, -4, 0.11), (1380, -7, .12),
               (1694, 1.5, 0.13), (1740, 4, 0.15), (2720, -6, 0.12), (2960, 5, 0.034), (3811, -6, 0.12),
               (4440, -9, 0.06)]
SECOND_MODES = [(772, 6.5, 0.18), (809, 1, 0.2), (1380, -8.5, .09), (1662, -4.5, 0.2), (1728, -3.5, 0.11),
                (2000, -6, .04), (2975, -4, 0.064), (3830, -15, 0.1), (4740, -16, 0.11)]
BLOCK_MODES = [(636, 2, 0.09), (732, -8, .12), (850, -6.5, 0.07), (939, 10, 0.085), (1513, -6, 0.15),
               (1974, -5, 0.07), (2540, -8.5, 0.045)]
CLAMP_MODES = [(290, -3, 0.13), (345.4, 2.5, 0.16), (422, 5, 0.14), (490, 0, .1), (640, 1, .07),
               (744, -8, 0.1), (1072, -13, .18)]
FRAME_MODES = [(64.5, 0.015, 0.11), (89, 0, 0.29), (121, 0.011, .14)]
BENCH_MODES = [(195, -5, 0.16), (246.3, -4.5, .11), (273.8, -5, 0.17), (345, -3.5, 0.12),
               (433.6, -2.5, 0.14), (488, -10.5, 0.076), (626, -9.5, 0.11)]
# What lands on the bench. Each row: name, then thud centre in Hz, thud t60 in seconds, clatter in dB,
# boom of the bench frame in dB, modes of its own.
LOADS = {"bundle": (244, 0.18, -6.5, -34, STRIP_MODES), "bundle end": (209, 0.089, -1.1, -19, STRIP_MODES),
         "second bundle": (300, 0.11, 0.5, -36.5, SECOND_MODES),
         "block": (317, 0.078, 6, -27.5, BLOCK_MODES), "clamp": (412, 0.18, -11, -37, CLAMP_MODES)}
# Shape of the thud. Each row: multiple of the thud centre, relative level in dB.
THUD = [(.1, -31), (.2, -24.5), (.45, -12.5), (.7, -7), (1, 2.5), (1.5, -3.5), (2.6, -8), (4.5, -36.5),
        (12, -62.5)]
# Spectra of the clatter and the crack. Each row: frequency in Hz, relative level in dB.
CLATTER = [(200, -18.5), (600, 6.5), (1000, 5), (1400, -2.5), (2200, -8.5), (4000, -21)]
CRACK = [(400, -29), (1500, 2.5), (3000, 5), (5000, 0.5), (8500, -8.5), (10500, -48), (16000, -41.5)]
CLATTER_FOLLOWS = 0.65  # share of the crack's dB by which a harder contact also clatters more


def knocks():
    """Impact excitation: a blow cracks, rings what lands and thuds the bench; gives direct sound and room share."""
    out, to_room = np.zeros((2, 2, N))
    for s, load, db, crack_db, ring_db, room_db in KNOCKS:
        # what lands decides which of the bench's modes answer most
        thud_hz, thud_t60, clatter_db, frame_db, modes = LOADS[load]
        shape = np.array(THUD) * [thud_hz, 1]
        bench_modes = [(hz, mode_db + at_hz(shape, hz), t60) for hz, mode_db, t60 in BENCH_MODES]
        thud = amp(0.5) * burst(shape, t60=thud_t60, rise=0.0004)
        bench = amp(-2.0) * ring(bench_modes, scatter_db=3.0, detune=0.0063)
        frame = amp(frame_db) * ring(FRAME_MODES, scatter_db=0.5)
        clatter = amp(clatter_db + CLATTER_FOLLOWS * crack_db) * burst(CLATTER, t60=0.051)
        own = amp(ring_db - 2.5) * ring(modes, scatter_db=5.0, detune=0.0019)
        crack = amp(crack_db - 2.0) * burst(CRACK, t60=0.03, rise=0.00072)
        blow = amp(db) * (thud + bench + frame + clatter + own + crack)
        add(out, s, blow)
        add(to_room, s, amp(room_db) * blow)
    return out, to_room


DIP_S, DIP_LENGTH_S, DIP_FADE_S = 2.4, 0.26, 0.03  # silent stretch of the reverberation, and its fades


def scene():
    """Superposition: everything on the bench, its reverberation in the shop and the still air."""
    wood, wood_to_room = knocks()
    steel, clicks, slides = clamps(), snaps(), sliding_wood()
    echo = workshop(wood_to_room + amp(-5.0) * steel + amp(-42.5) * clicks + amp(-8.5) * slides)
    # the reverberation drops out briefly, once
    echo = echo * (1 - held(DIP_S - DIP_FADE_S, DIP_LENGTH_S + 2 * DIP_FADE_S, DIP_FADE_S))
    return still_air() + echo + squeals() + hands() + paper() + clicks + steel + slides + wood


STOPBAND_HZ = 16800  # from here up the treble is 60 dB down


def record(dry):
    """Clipping and band limiting: peaks beyond full scale flatten, then a steep lowpass cuts the top."""
    lowpass = signal.cheby2(14, 60, STOPBAND_HZ, fs=SR, output="sos")
    return signal.sosfilt(lowpass, np.clip(dry, -1, 1))


dry = scene()
out = record(dry)
master(out)
```